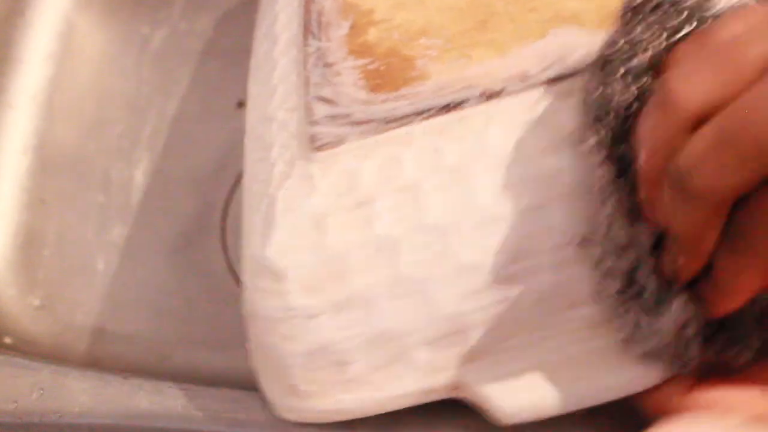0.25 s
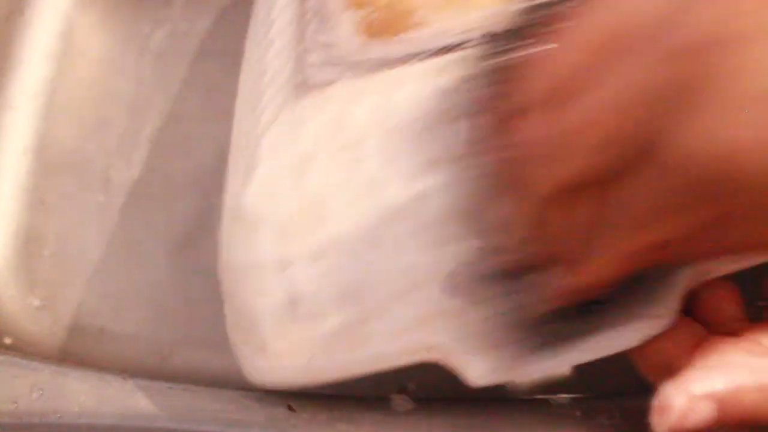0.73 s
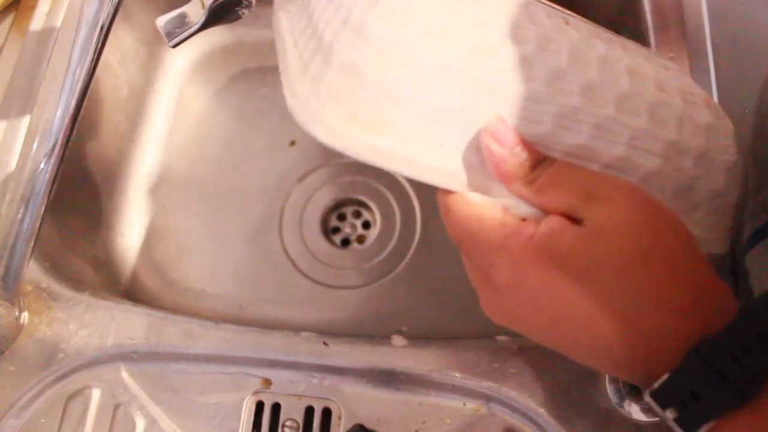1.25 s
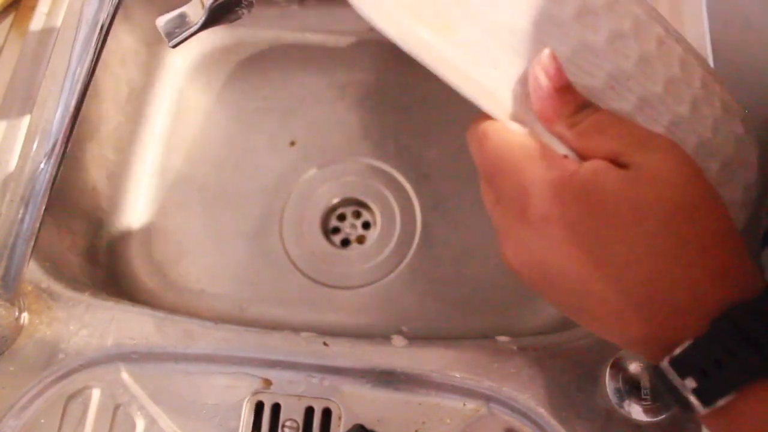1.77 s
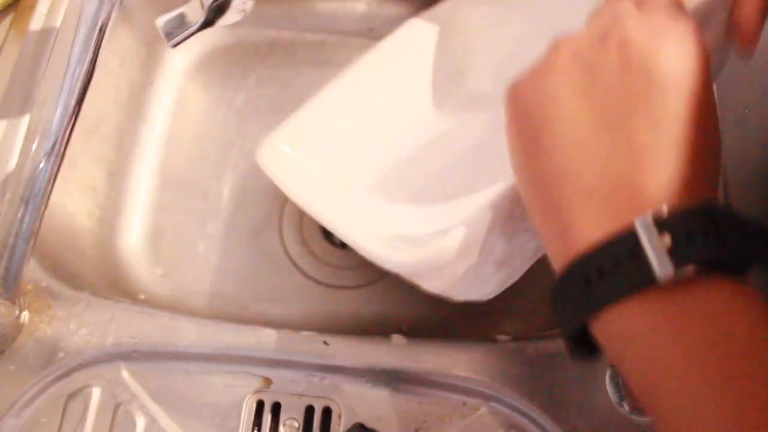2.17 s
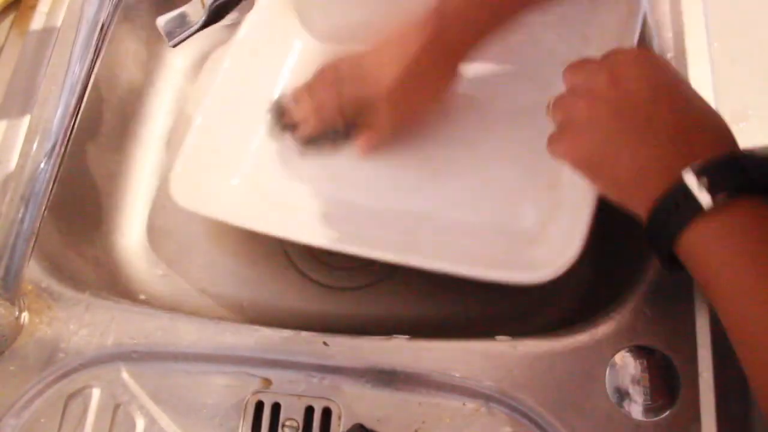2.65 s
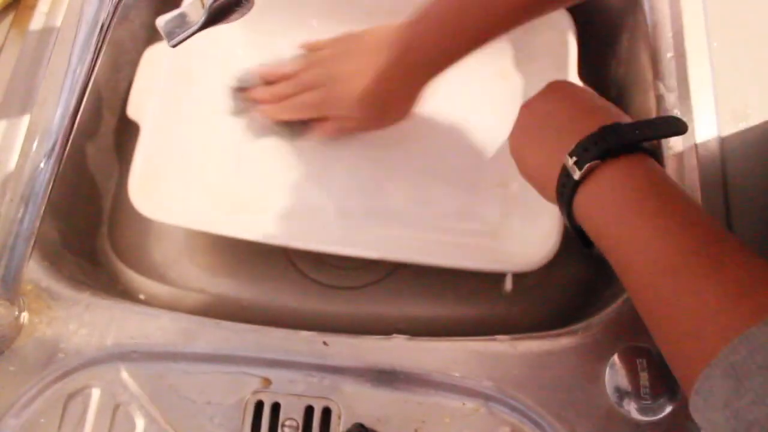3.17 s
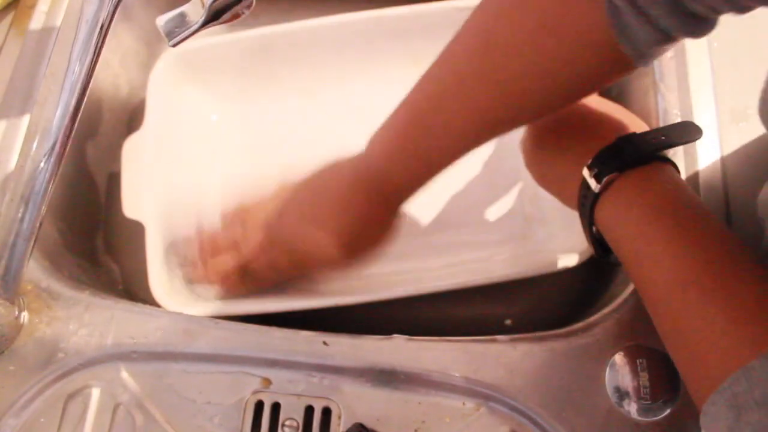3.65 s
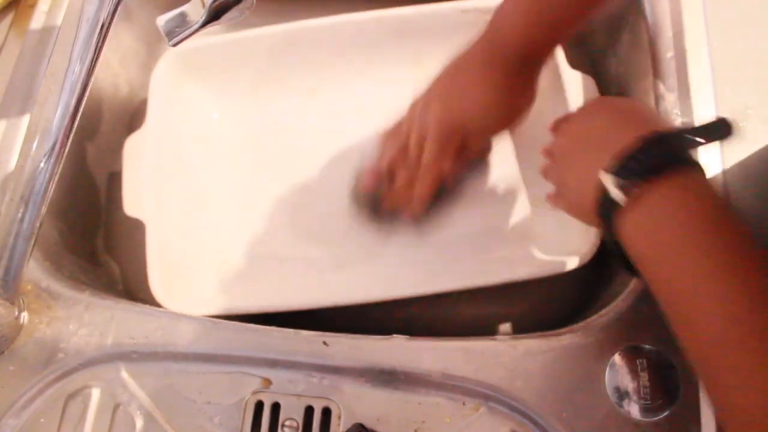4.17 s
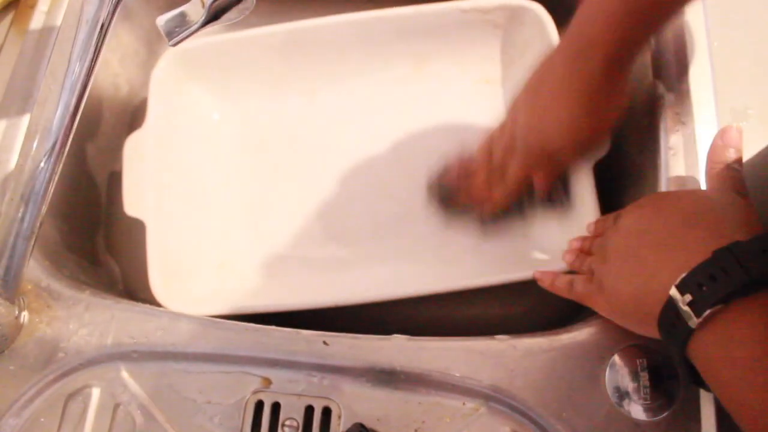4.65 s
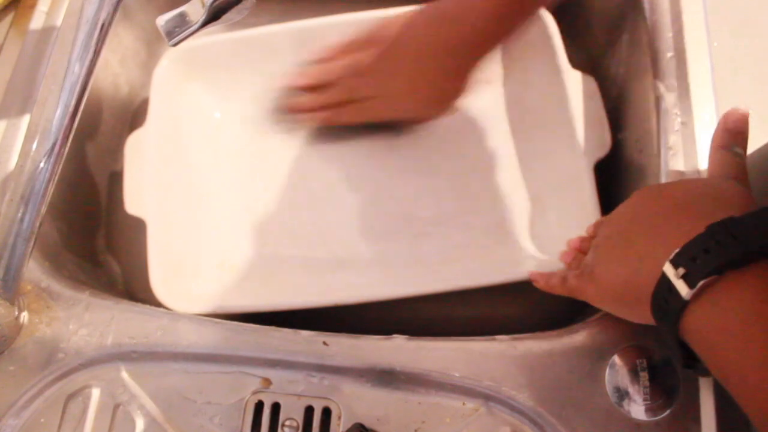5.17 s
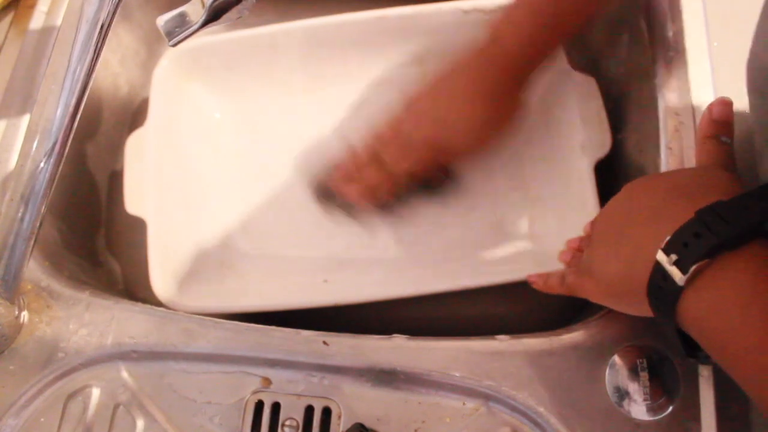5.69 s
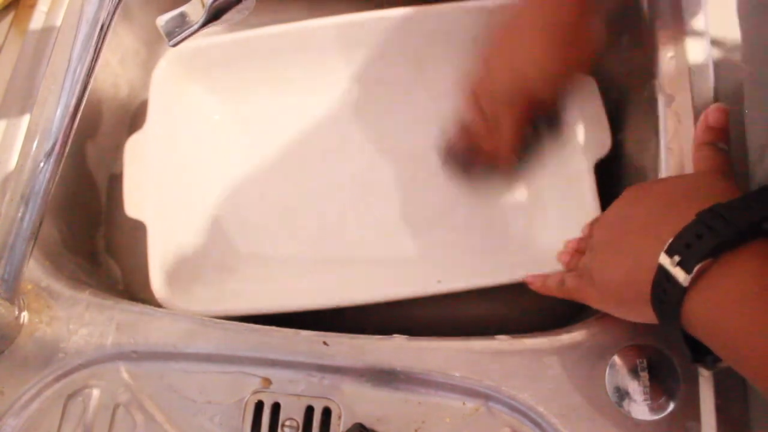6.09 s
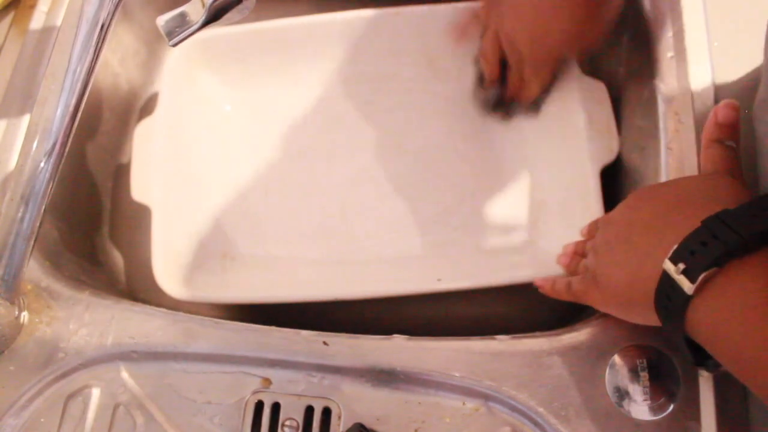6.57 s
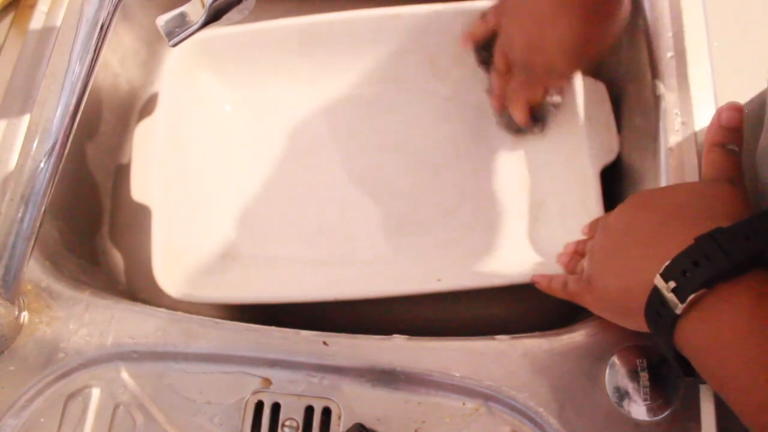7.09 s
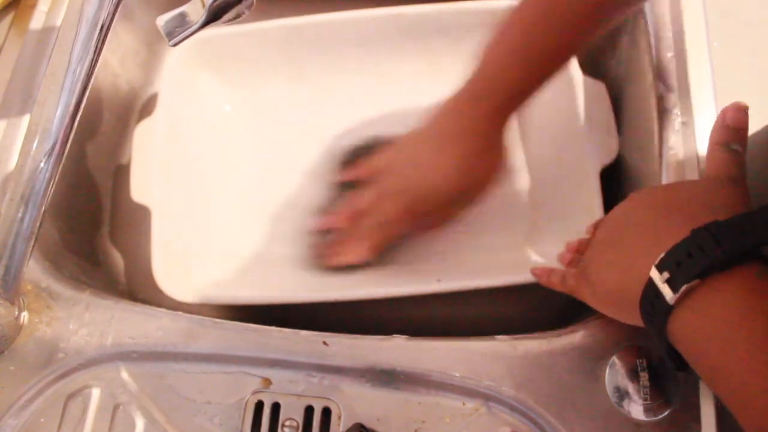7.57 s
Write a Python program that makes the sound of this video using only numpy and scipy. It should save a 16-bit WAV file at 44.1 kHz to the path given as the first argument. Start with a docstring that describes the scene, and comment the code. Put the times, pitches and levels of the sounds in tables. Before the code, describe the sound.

Wire wool scrubs a ceramic dish in a metal basin, heard very close with short room echo. First soft, dull rubbing and a low shudder, then bright scratchy hiss, a cluster of hollow clanks ending in the loudest blow, and finally rhythmic back-and-forth scrubbing with hard rasps, faint squeaks and light ceramic taps.

```python
"""In a steel kitchen sink, a ceramic oven dish is scrubbed with a steel-wire scourer, heard from close by.
The wires hiss and crackle (random impulses shaped by a spectrum), and hard strokes make the dish rasp.
The dish judders across the basin, clanks as it is turned over, then rocks and knocks under the hand;
these blows are fading sine modes and noise bursts. Brief tones, room echo and a faint room tone join in."""
import sys
import numpy as np
from scipy import signal
from scipy.fft import rfft, irfft, next_fast_len
from scipy.io import wavfile
from scipy.ndimage import uniform_filter1d, map_coordinates

SR = 44100
rng = np.random.default_rng(int(sys.argv[2]) if len(sys.argv) > 2 else 0)


def output_pcm(signal):
    """Save a mono or channel-first signal as 16-bit PCM at the path in sys.argv[1].

    Samples are clipped to [-1, 1] before scaling.
    """
    pcm = np.clip(np.atleast_2d(signal).T, -1, 1) * 32767
    wavfile.write(sys.argv[1], SR, np.round(pcm).astype(np.int16))


N = 345744


def amp(db):
    """Turn decibels into gain."""
    return np.exp(np.asarray(db) * (np.log(10) / 20))


def unit(x):
    """Scale to an rms of 1."""
    return x / np.sqrt(np.mean(x ** 2) + 1e-20)


def unit_attack(x):
    """Scale so that the first 20 ms have an rms of 1."""
    return x / np.sqrt(np.mean(x[:SR // 50] ** 2) + 1e-20)


def along(points, hz):
    """Read a curve of (Hz, value) points on a log frequency axis."""
    point_hz, value = np.transpose(points)
    return np.interp(np.log(hz + 1), np.log(point_hz + 1), value)


def curves(rows):
    """Join the rows with straight lines: one value per sample for each column after the time."""
    seconds, *columns = np.transpose(rows)
    return [np.interp(np.arange(N) / SR, seconds, column) for column in columns]


def wobble(rate):
    """A smooth random curve through rate random points a second."""
    points = rng.standard_normal(int(N * rate / SR) + 4)
    return map_coordinates(points, [np.arange(N) * rate / SR])


def filtered(x, response):
    """Multiply the spectrum of x by a response that depends on frequency."""
    size = next_fast_len(len(x) + 4096)
    spectrum = rfft(x, size) * response(np.fft.rfftfreq(size, 1 / SR))
    return irfft(spectrum, size)[:len(x)]


def coloured(x, spectrum, peaks=()):
    """Give x a broad spectrum with (Hz, width Hz, dB) peaks on top, then an rms of 1."""
    def response(f):
        """Broad curve plus peaks, as gain."""
        bumps = sum(db / (1 + (2 * (f - hz) / width) ** 2) for hz, width, db in peaks)
        return amp(along(spectrum, f) + bumps)
    return unit(filtered(x, response))


def snaps(rate, spread_db):
    """Tiny slips of single wires: about rate random impulses a second, of log-normal size."""
    happens = rng.random(N) < rate / SR
    size = rng.standard_normal(N) * amp(spread_db * rng.standard_normal(N))
    return unit(happens * size)


def add(track, s, sound):
    """Mix a sound into a track at time s, in seconds."""
    room = track[max(round(s * SR), 0):][:len(sound)]
    room += sound[:len(room)]


def shifting(x, depth_db, size, order):
    """The contact moves, so resonances come and go in patches, size bins wide and order frames long."""
    z = signal.stft(x, nperseg=1024)[2]
    field = rng.standard_normal(z.shape)
    for _ in range(2):
        field = uniform_filter1d(field, size, axis=0)
        field = uniform_filter1d(field, order, axis=1)
    return unit(signal.istft(z * amp(depth_db * unit(field)), nperseg=1024)[1][:N])


def ring(modes, t, tilt_db, length, detune):
    """Modes struck at a new spot: strengths vary, and the grip shifts each pitch a little."""
    hz, db, t60 = np.transpose(modes)[:, :, None]
    size, shift, side = rng.standard_normal((3, len(modes), 1))
    level_db = db + 2.2 * size + tilt_db * np.minimum(np.log2(hz / 1000), 1)
    waves = np.sign(side) * np.sin(2 * np.pi * hz * (1 + detune * shift) * t)
    fade_db = -60 * t / (t60 * length)
    return unit_attack(np.sum(amp(level_db + fade_db) * waves, axis=0))


# Notes the dish rings at.
# Each row: pitch in Hz, relative level in dB, time to fade by 60 dB in seconds before the blow's own factor.
DISH_MODES = [(472, -4.5, 0.12), (624, -8.5, 0.12), (658, -0.5, 0.11), (722, 2, 0.12), (740.8, 0.5, 0.075),
              (800, -18, 0.07), (981.6, -6.5, 0.16), (1044, -4, 0.17), (1219, -2, 0.065), (1341, 2, 0.093),
              (1462, -1.5, .11), (1779, -6.5, 0.055), (1863, -0.5, 0.079), (1953, -19.5, 0.16),
              (2224, -21, 0.33), (2362, -11, 0.23), (2788, -2, 0.045), (2970, -8.5, 0.092),
              (3764, -5, 0.053), (5040, -5.5, 0.04)]


def dish_peaks(width_hz, height_db):
    """The dish's modes, all equally high and broadened by the hand pressing on it."""
    return [(hz, width_hz, height_db) for hz, _, _ in DISH_MODES]


# Tone of the quiet room. Each row: frequency in Hz, relative level in dB per Hz.
QUIET_SPECTRUM = [(25, -24), (60, -11), (105, 20.5), (140, -41), (300, 9), (2000, -8), (15000, -18)]


def room_tone():
    """A faint steady noise with the spectrum of the quiet room."""
    return amp(-66.5) * coloured(rng.standard_normal(N), QUIET_SPECTRUM)


# How long the kitchen echoes. Each row: frequency in Hz, time to fade by 60 dB in seconds.
KITCHEN_FADE = [(150, 0.19), (1000, 0.22), (5000, 0.21), (15000, 0.042)]


def kitchen(x):
    """A small hard room: an echo tail of noise in which each frequency dies at its own speed."""
    hz, t, z = signal.stft(rng.standard_normal(SR // 2), SR, nperseg=256)
    fade = amp(-60 * t / along(KITCHEN_FADE, hz)[:, None])
    tail = signal.istft(z * fade, SR, nperseg=256)[1]
    tail = np.pad(tail / np.linalg.norm(tail), (round(.008 * SR), 0))  # the echo starts 8 ms late
    return signal.fftconvolve(x, tail)[:N]


# How heavily the scrubbed dish leans on the basin. Each row: time in seconds, drone level in dB.
LEANING_LEVELS = [(0, -38.5), (.1, -45.5), (.22, -54), (.39, -55), (.455, -37.5), (.5, -45.5), (.65, -53),
                  (.9, -30), (1.0, -90)]
# Notes of the basin with the dish's weight on it; the drone uses only the pitches, the judder all columns.
# Each row: pitch in Hz, relative level in dB, time to fade by 60 dB in seconds before the judder shortens it.
LOADED_BASIN_MODES = [(111, -6, 0.24), (141, -7.5, 0.086), (164, 6, 0.082), (199, -2, 0.11),
                      (240, -8, 0.11), (315, 1.5, 0.15), (362, -3.5, 0.078)]


def basin_drone():
    """While the dish leans on the basin, the scrubbing is carried into the steel as a low noise."""
    leaning_db, = curves(LEANING_LEVELS)
    # each pair: frequency in Hz, relative level in dB per Hz
    steel = [(30, -32), (70, -17), (105, 1.0), (200, -7), (350, 6.5), (500, -5), (1500, -27)]
    peaks = [(hz, 25, 6) for hz, _, _ in LOADED_BASIN_MODES]
    return amp(leaning_db) * coloured(rng.standard_normal(N), steel, peaks)


# The dish sticks and slips across the basin. Each row: time in seconds, shudder level in dB, grind level in dB.
JUDDER_LEVELS = [(.696, -11.5, -25), (.76, -24, -33), (.795, -20.5, -33), (.835, -27, -22.5),
                 (.86, -24, -27.5), (.89, -33, -45), (.93, -39.5, -37), (.97, -67, -72)]
# Tone of the struck dish's body, used for the grind and for the knocks.
# Each row: frequency in Hz, relative level in dB per Hz.
BODY_SPECTRUM = [(100, -61), (400, 1.5), (560, 1.5), (720, 10.5), (1300, 7), (2200, 1), (3500, -3.5),
                 (7000, -70)]


def judder():
    """The dish's foot slips in uneven jerks, shakes the basin's low modes and grinds on the steel."""
    shudder_db, grind_db = curves(JUDDER_LEVELS)
    shake, t = np.zeros(N), np.arange(SR // 5) / SR
    gaps = rng.uniform(.012, .024, size=15)  # s between jerks
    slips = JUDDER_LEVELS[0][0] + np.cumsum(np.r_[0, gaps])
    for s in slips:
        jerk = ring(LOADED_BASIN_MODES, t, 0, 0.78, detune=0.043)
        add(shake, s, jerk * (1 - np.exp(-t / 0.0026)))
    shake /= np.std(shake[round(slips[0] * SR):round(slips[-1] * SR)])
    grit = coloured(snaps(rate=1500, spread_db=0.0), BODY_SPECTRUM, dish_peaks(width_hz=29, height_db=7.5))
    sliding, = curves([(slips[0] - .001, 0), (slips[0], 1), (slips[-1], 1), (slips[-1] + .05, 0)])
    return sliding * (amp(shudder_db) * shake + amp(grind_db) * grit)


# A tap's ring over the weaker of hiss and rub, thump under the ring, crack under the hiss (all dB)
TAP_RING_DB, TAP_THUMP_DB, TAP_CRACK_DB = -0.5, -9, -7
TAP_HZ, TAP_OCTAVES = 1140, 0.42  # middle pitch, and its random scatter in octaves
TAP_LENGTH = 0.96  # ring length factor
TAPS_FROM_S = 2.5  # after this the dish lies flat and the scourer bumps its walls


def taps():
    """Once the dish lies flat, the scourer bumps its wall at each turn: light knocks that follow the stroke."""
    rows = []
    for (s, hiss_db, rub_db), chance in zip(STROKES, rng.standard_normal(len(STROKES))):
        ring_db = min(hiss_db, rub_db) + TAP_RING_DB
        spot_hz = TAP_HZ * 2 ** (TAP_OCTAVES * chance)
        if s > TAPS_FROM_S:
            rows.append((s, ring_db + TAP_THUMP_DB, ring_db, spot_hz, hiss_db + TAP_CRACK_DB, TAP_LENGTH))
    return rows


# Knocks: the early ones are mostly dish against sink, many later ones scourer against dish wall with
# hardly any thump. Each row: start in seconds, basin thump level in dB, dish ring level in dB,
# pitch favoured by the contact spot in Hz, crack level in dB, ring length factor. Levels are before the mix.
KNOCKS = [(0.199, -35.5, -51, 1200, -58, .85), (0.4, -30.5, -32.5, 1000, -56, 1.4),
          (0.696, -29.5, -21.5, 1140, -34, 1.2), (0.811, -23.5, -29, 1300, -31.5, 1.1),
          (0.836, -25, -24, 900, -33, .75), (0.938, -34, -30, 635, -41, 0.77),
          (1.434, -19.5, -17, 630, -33, 1.1), (1.543, -37, -35.5, 650, -26.5, .8),
          (1.691, -22, -23, 600, -26, 0.74), (1.808, -29.5, -34.5, 1200, -28, 1.2),
          (1.935, -30.5, -13.5, 970, -25.5, 1.08), (2.025, -16, -7.5, 960, -26.5, 0.78),
          (2.076, -13.5, -15, 1110, -20.5, 0.91), (2.1, -25, -19, 720, -29.5, 1),
          (2.143, -32.5, -32, 1500, -28.5, 1.1), (2.191, -33, -22, 725, -28, 1.2),
          (2.213, -27, -22, 660, -31, 0.9), (2.288, -25, -25.5, 706, -32.5, 1.1),
          (2.314, -28, -35, 960, -43, 1.1), (2.431, -11.5, .5, 1050, -18, 1.2),
          (2.567, -48, -27, 730, -28.5, 2), (2.605, -45, -20.5, 690, -26.5, 0.87),
          (2.704, -63, -29, 710, -28.5, 1.8), (2.744, -34, -35, 680, -29.5, 1),
          (3.056, -25.5, -18, 730, -28, 1.05), (3.098, -38, -27, 760, -27.5, 1.9),
          (3.256, -39, -32.5, 1170, -31, 1.2), (3.537, -34, -22.5, 1050, -27, 0.78),
          (4.018, -47, -33.5, 1800, -35, 1.3), (4.182, -46.5, -34, 1860, -47, 1.2),
          (4.577, -43, -23.5, 708, -28.5, 0.57), (4.948, -53, -40.5, 1890, -53, 1),
          (5.119, -42, -33, 1870, -27.5, 1), (5.158, -39.5, -33.5, 1340, -36, .7),
          (5.675, -58, -43, 1000, -42, .8), (5.711, -60, -29, 1200, -35, 1.1),
          (5.731, -57, -33.5, 1250, -29, 0.63), (5.863, -37, -21, 1250, -25, 1.2),
          (5.922, -60, -29, 1780, -31.5, 0.45), (6.016, -41.5, -30.5, 1750, -32, 1.2),
          (6.106, -60, -33.5, 1720, -30, 1.2), (6.251, -30, -26, 1400, -35, 1.3),
          (6.338, -36, -22.5, 1500, -25.5, 1.1), (6.512, -39, -28, 1870, -32, 1.5),
          (6.613, -49, -32, 1320, -40, .85), (7.026, -62, -32, 1260, -45, .6),
          (7.241, -55, -39.5, 1100, -46, 1.1), (7.334, -42.5, -40, 1100, -37, 1.5),
          (7.549, -58, -31.5, 2180, -54, 1.1), (7.777, -45, -30.5, 1270, -35, 0.62)]
# Some spots ring brighter. Each row: pitch of the spot in Hz, brightness in dB per octave.
SPOT_TILT = [(600, -14.5), (700, -0.5), (1000, 0.5), (1300, 7), (2000, 7)]
# Notes of the steel basin.
# Each row: pitch in Hz, relative level in dB, time to fade by 60 dB in seconds before a small shortening.
BASIN_MODES = [(104, -25, 0.06), (179, -12, 0.12), (198.9, -3, 0.16), (235.5, 0.5, 0.12), (276, -1, 0.1),
               (300, -1, 0.081), (403, -6, 0.089)]
# Tone of the basin's thump. Each row: frequency in Hz, relative level in dB per Hz.
THUMP_SPECTRUM = [(25, -57), (70, -27), (130, -29), (220, 2), (400, -1), (700, -6), (2000, -56)]
# Tone of the contact's crack. Each row: frequency in Hz, relative level in dB per Hz.
CRACK_SPECTRUM = [(500, -14.5), (2000, -0.5), (3700, 6), (6000, 5.5), (10000, 2.5), (15500, -4)]


def knocks():
    """Each contact cracks, rings the dish and, strongly or hardly at all, thumps the steel basin."""
    out, t = np.zeros(N), np.arange(round(.3 * SR)) / SR

    def burst(spectrum, t60, peaks=()):
        """Fading noise for the many close, quickly damped modes of a blow."""
        noise = coloured(rng.standard_normal(len(t)), spectrum, peaks)
        return unit_attack(noise * amp(-60 * t / t60))

    for s, thump_db, ring_db, spot_hz, crack_db, length in KNOCKS + taps():
        tilt_db = along(SPOT_TILT, spot_hz)
        # the contact spot favours the modes near one pitch
        width_hz, favour_db = 0.25 * spot_hz, 7
        modes = [(hz, db + favour_db / (1 + (2 * (hz - spot_hz) / width_hz) ** 2), t60)
                 for hz, db, t60 in DISH_MODES]
        body = [(hz, db + tilt_db * np.clip(np.log2(hz / 1000), -1, 1)) for hz, db in BODY_SPECTRUM]
        clack = burst(body, 0.054 * length, [(spot_hz, width_hz, favour_db)])
        dish = .78 * ring(modes, t, tilt_db, length, detune=.003) + .62 * clack
        basin = 0.81 * ring(BASIN_MODES, t, 0, 0.9, detune=0.029) + 0.4 * burst(THUMP_SPECTRUM, t60=0.089)
        # the lighter the blow, the slower the crack builds
        contact_s = 0.00043 * amp(-.9 * (ring_db + 27.0))
        crack = unit_attack(burst(CRACK_SPECTRUM, t60=0.051) * (1 - np.exp(-t / contact_s)))
        # a short deep push that grows faster than the ring, so it matters in heavy blows
        u = t / 0.0042
        push = amp(1.5 * ring_db - 9.5) * (1 - u) * np.exp(-u)
        swing = (amp(ring_db) * dish + amp(thump_db) * basin + push) * (1 - np.exp(-t / 0.00093))
        add(out, s, swing + amp(crack_db) * crack)
    return out


# Brief tones: squeaks on the wet glaze, and at 4.585 s the ring of a knock.
# Each row: middle in seconds, length in seconds, pitch in Hz, level in dB before a shared boost.
BRIEF_TONES = [(2.42, 0.04, 2030, -34), (2.79, 0.11, 697, -33.5), (2.98, 0.098, 1853, -42),
               (3.642, .05, 6760, -38), (3.655, 0.11, 3780, -53), (4.235, 0.058, 3740, -49),
               (4.585, 0.027, 579, -34), (4.835, 0.043, 3750, -50)]


def brief_tones():
    """Single resonances sound briefly as sines that swell and sink, with an unsteady pitch."""
    out, t = np.zeros(N), np.arange(N) / SR
    turns = 2 * np.pi * np.cumsum(1 + 0.00554 * wobble(200)) / SR  # phase of an unsteady 1 Hz
    for s, length, hz, db in BRIEF_TONES:
        span = np.abs(t - s) < length / 2
        swell = np.cos(np.pi * (t[span] - s) / length)
        out[span] += amp(db + 4.5) * swell * np.sin(hz * turns[span])
    return out


# The steel walls around the scourer echo it. Each row: delay in seconds, gain as a plain factor.
WALL_ECHOES = [(.0011, 0.19), (.0019, 0.051), (.0031, .14), (.0047, -0.18), (.0074, 0.13), (0.013, 0.2)]


def walled(x):
    """Close walls comb the sound, with its power kept about the same."""
    out = x.copy()
    for delay, gain in WALL_ECHOES:
        add(out, delay, gain * x)
    return out / np.sqrt(1 + sum(gain ** 2 for _, gain in WALL_ECHOES))


# Hard strokes. Each row: start in seconds, end in seconds, wire hiss level in dB,
# dish rasp level in dB before a shared boost.
SCRAPES = [(1.207, 1.23, -25.5, -46), (1.958, 1.989, -27.5, -26), (2.44, 2.51, -61, -22.5),
           (2.758, 2.821, -26, -27), (3.019, 3.105, -29, -30), (3.133, 3.16, -24, -28.5),
           (3.275, 3.34, -23.5, -27.5), (3.436, 3.576, -24.5, -27), (3.883, 3.931, -30.5, -36),
           (4.173, 4.201, -26, -31.5), (5.094, 5.14, -27.5, -34.5), (6.202, 6.27, -24, -28),
           (6.501, 6.543, -32.5, -31.5), (6.582, 6.623, -32.5, -33), (7.524, 7.555, -32, -38),
           (7.695, 7.721, -30.5, -33), (7.802, 7.835, -30, -31)]
# Resonances that colour the hiss, here and in the scrubbing. Each row: pitch in Hz, width in Hz, height in dB.
GLAZE_PEAKS = [(3747, 270, 12.5), (5100, 250, 5.5), (5500, 80, 6), (7430, 240, 2.5), (8050, 130, 5),
               (11400, 200, 0.5)]
# Tone of hard-pressed wires. Each row: frequency in Hz, relative level in dB per Hz.
PRESSED_SPECTRUM = [(500, -35), (2000, -10), (3500, -6.5), (5300, 6), (8000, 6), (12000, 4.5), (15500, 1)]
# Tone of the rasping dish. Each row: frequency in Hz, relative level in dB per Hz.
RASP_SPECTRUM = [(30, -40), (130, -16), (230, 0), (520, -7), (700, -3), (1250, 8), (1900, 1.5), (2800, 0.5),
                 (5000, -4), (10000, -52)]


def scrapes():
    """Pressed hard into the walls, the wires bite and the dish rasps."""
    t = np.arange(N) / SR
    hiss, rasp = np.zeros(N), np.zeros(N)
    for start, end, hiss_db, rasp_db in SCRAPES:
        stroke = np.interp(t, [start - .001, start + 0.0062, end - .008, end + 0.014], [0, 1, 1, 0])
        hiss += amp(hiss_db) * stroke
        rasp += amp(rasp_db) * stroke
    wires = coloured(snaps(rate=8800, spread_db=0.5), PRESSED_SPECTRUM, GLAZE_PEAKS)
    wires = shifting(wires, depth_db=2.5, size=4, order=4)
    dish = coloured(snaps(rate=4500, spread_db=1.0), RASP_SPECTRUM, dish_peaks(width_hz=73, height_db=6.5))
    dish = shifting(dish, depth_db=4.5, size=3, order=4)
    flutter = amp(1.63 * wobble(130))
    return flutter * (hiss * wires + amp(2.5) * rasp * dish)


# Strokes of the scourer, each lasting until the hand turns for the next.
# Each row: start in seconds, wire hiss level in dB, dish rub level in dB. Levels are before shared trims.
STROKES = [(0.0, -48.5, -39.5), (0.095, -40, -40.5), (0.337, -37, -38), (0.522, -35, -36.5),
           (0.925, -43, -67), (1.025, -40.5, -64), (1.095, -40, -64), (1.175, -38.5, -63),
           (1.24, -26.5, -44), (1.345, -25, -44), (1.46, -28.5, -41), (1.589, -33.5, -42.5),
           (1.72, -28.5, -41), (1.934, -35.5, -40), (2.191, -37.5, -36), (2.431, -29.5, -27.5),
           (2.605, -35, -37.5), (2.702, -35, -32), (2.85, -27.5, -33), (2.99, -31.5, -32),
           (3.24, -29.5, -49), (3.43, -33, -32.5), (3.72, -37, -39), (3.967, -33, -45),
           (4.141, -35.5, -47.5), (4.324, -34.5, -41.5), (4.525, -34, -41.5), (4.725, -32.5, -48),
           (4.916, -35, -49), (5.096, -35, -45), (5.23, -40, -52.5), (5.3, -34, -47), (5.369, -31, -39),
           (5.455, -32.5, -47), (5.711, -32, -48), (5.863, -34, -42), (6.016, -33.5, -45),
           (6.2, -34, -30.5), (6.338, -36, -40), (6.45, -35.5, -48), (6.69, -37, -44.5),
           (6.925, -35.5, -46.5), (7.026, -38, -48), (7.141, -35.5, -46), (7.241, -38.5, -46.5),
           (7.334, -30.5, -40.5), (7.575, -36, -49), (7.68, -33.5, -41)]
# The hand all but stops between straight strokes, and only slows once it circles in the dish.
# Each row: time in seconds, drop in level at a turn in dB.
LULL = [(0, 9.5), (1.35, 9), (1.6, 5), (4.0, 2), (7.8, 2.5)]
RUB_FADE_DB = 3.5  # the rub sinks by this much from the start of a stroke to its end
TURN_SHAPE, REGRIP_S = 3.2, 0.066  # steepness of the lull (exponent), time to change pressure (s)


def stroke_levels():
    """Hiss, rub and lull in dB: a stroke swells as the hand speeds up and sinks as it slows for the turn."""
    start, hiss_db, rub_db = np.transpose(STROKES)
    progress = np.interp(np.arange(N) / SR, np.r_[start, N / SR], np.arange(len(start) + 1))
    stroke = np.minimum(progress.astype(int), len(start) - 1)
    from_middle = progress - stroke - .5  # -0.5 at the start of a stroke, 0.5 at its end
    lull_db = curves(LULL)[0] * np.abs(2 * from_middle) ** TURN_SHAPE

    def regrip(db):
        """Smooth the jumps between strokes."""
        return uniform_filter1d(db, max(round(REGRIP_S * SR), 1))

    hiss = regrip(hiss_db[stroke]) - lull_db
    rub = regrip(rub_db[stroke] - RUB_FADE_DB * from_middle) - lull_db
    return hiss, rub, lull_db


# How far the palm covers the scourer. Each row: time in seconds, covered share from 0 to 1.
COVER = [(0, 0.9), (.85, 1), (1.0, 0.08), (1.9, 0.06), (2.0, 0.65), (2.5, 0.5), (2.9, 0.03), (7.8, 0.04)]
# Tone of the open wires. Each row: frequency in Hz, relative level in dB per Hz.
WIRES_SPECTRUM = [(300, -47), (1500, -17), (2500, -6), (3300, -8), (4400, -4), (7000, 1.5), (11000, 2.5),
                  (15500, 0)]
# Tone of the covered wires. Each row: frequency in Hz, relative level in dB per Hz.
COVERED_SPECTRUM = [(300, -15.5), (1500, -9), (3000, -1), (5000, -3), (7000, -5), (10000, -13.5),
                    (15500, -21)]
# Tone of the rubbed dish. Each row: frequency in Hz, relative level in dB per Hz.
RUB_SPECTRUM = [(30, -46), (100, -27), (140, -3), (210, 12.5), (300, 0.5), (380, 0.5), (530, 1.5),
                (700, -1.5), (1300, 5), (2000, 4), (2700, 0), (4000, 4), (9000, -16)]
SLOW_DULLING = 0.21  # extra loss of the bright hiss from slow wires, in dB per dB of lull


def scrubbing():
    """Thousands of wire slips a second hiss in the air and stir the dish."""
    hiss_db, rub_db, lull_db = stroke_levels()
    cover = np.clip(curves(COVER)[0], 0, 1)
    catch = wobble(55)  # coils catch and let go in bunches
    bright = coloured(snaps(rate=28000, spread_db=1.5), WIRES_SPECTRUM, GLAZE_PEAKS)
    bright *= amp(-SLOW_DULLING * lull_db)
    dull = coloured(rng.standard_normal(N), COVERED_SPECTRUM)
    wires = np.sqrt(1 - cover) * bright + np.sqrt(cover) * dull
    wires = shifting(wires, depth_db=2.5, size=4, order=4)
    rub = coloured(snaps(rate=3400, spread_db=2), RUB_SPECTRUM, dish_peaks(width_hz=59, height_db=7))
    rub = shifting(rub, depth_db=3.5, size=3, order=5)
    return amp(hiss_db - 1.0 + 1.88 * catch) * wires + amp(rub_db - 4 + 2.4 * catch) * rub


def scene():
    """Scourer, dish and basin in the kitchen, over a faint room tone."""
    rubbing = walled(scrubbing() + scrapes()) + brief_tones()
    blows = knocks() + judder() + basin_drone()
    echo = kitchen(amp(-16) * rubbing + amp(-11.0) * blows)
    return (rubbing + blows + echo + room_tone())[None]


def limited(x, threshold_db, attack, release_db):
    """Gain dips a few ms after a loud peak and recovers at release_db a second."""
    over_db = np.maximum(20 * np.log10(np.abs(x) + 1e-9) - threshold_db, 0)
    ramp = release_db * np.arange(N) / SR
    cut_db = np.maximum.accumulate(over_db + ramp) - ramp  # holds each peak, then sinks steadily
    pole = np.exp(-1 / (attack * SR))
    return x * amp(-signal.lfilter([1 - pole], [1, -pole], cut_db))


def record(dry):
    """The level ducks after loud clanks, what gets through is rounded off, and the top treble is removed."""
    x = limited(dry[0], threshold_db=-4.0, attack=0.0042, release_db=134)
    ceiling, top_hz = .54, 15750
    rounded = x / (1 + np.abs(x / ceiling) ** 6) ** (1 / 6)
    return filtered(rounded, lambda hz: hz < top_hz)[None]


dry = scene()
out = record(dry)
output_pcm(out)
```